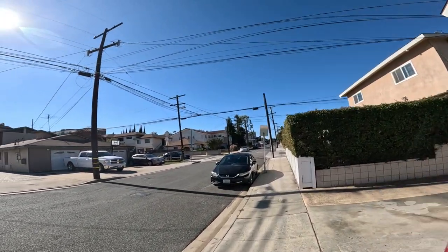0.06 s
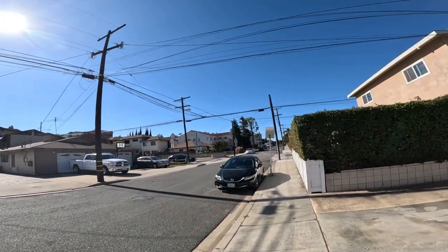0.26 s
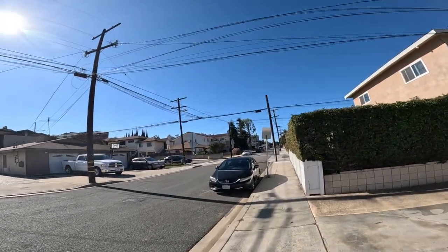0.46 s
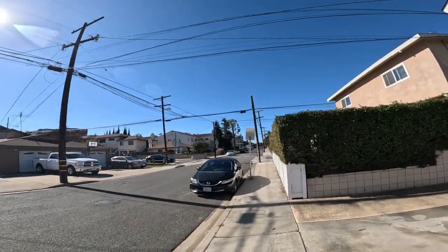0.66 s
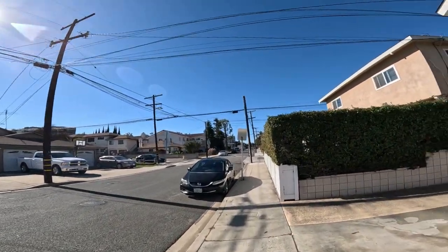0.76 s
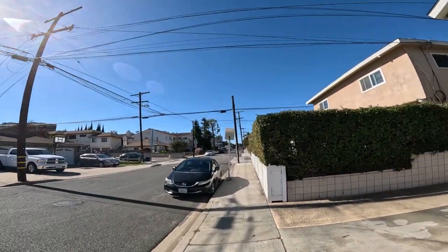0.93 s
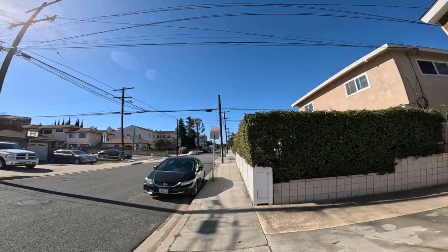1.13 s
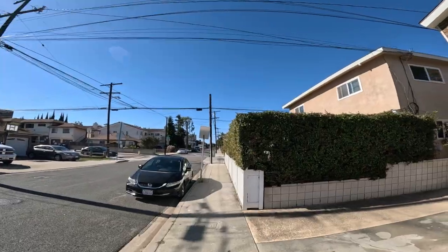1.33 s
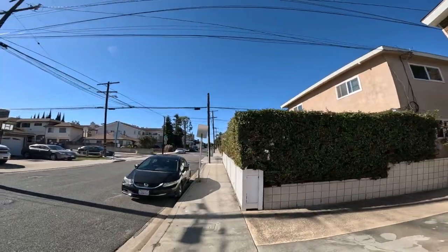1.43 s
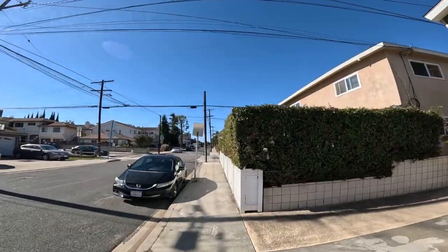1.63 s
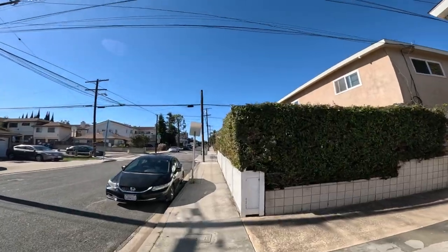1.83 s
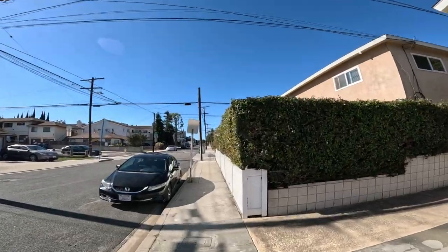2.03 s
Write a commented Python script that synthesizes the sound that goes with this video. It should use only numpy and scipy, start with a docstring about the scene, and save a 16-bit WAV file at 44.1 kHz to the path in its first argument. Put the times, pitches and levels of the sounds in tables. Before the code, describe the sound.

Wind rumbles on the microphone throughout, with clusters of dull thumps around 0.2 to 0.5 seconds and from 1.1 to 1.9 seconds. Underneath, soft shoes scuff concrete about twice a second, with slight ticks of grit. A tiny metal tink comes at 0.5 seconds. A small bird chirps faintly near 0.9 and 1.6 seconds, and far traffic hums very quietly.

```python
"""A windy sidewalk walk

Wind rumbles on the microphone, and little swirls of air thump against its opening.
Underneath, soft soles scuff the concrete about twice a second, and sand ticks and crackles.
A small bird chirps, a bit of metal tinks once, and a quiet street hums far away."""
import sys
import numpy as np
from scipy import signal
from scipy.fft import rfft, irfft
from scipy.io import wavfile

SR = 44100
rng = np.random.default_rng(int(sys.argv[2]) if len(sys.argv) > 2 else 0)


def generate_wav(signal):
    """Clip the signal to [-1, 1] and save it as 16-bit WAV at the path in sys.argv[1]."""
    frames = np.transpose(np.atleast_2d(signal))
    scaled = np.clip(frames, -1, 1) * 32767
    pcm = np.round(scaled).astype(np.int16)
    wavfile.write(sys.argv[1], SR, pcm)


N = 91904
T = np.arange(N) / SR


def from_db(db):
    """Turn decibels into a number to multiply by."""
    return 10 ** (np.asarray(db) / 20)


def rms_one(x):
    """Scale a signal so its average strength (rms) is 1."""
    return x / np.sqrt(np.mean(x ** 2) + 1e-20)


def in_time(rows):
    """Join (time, value) points with straight lines."""
    return np.interp(T, *np.transpose(rows))


def at_hz(points, hz):
    """Read between (frequency, value) points, spaced by octaves."""
    freqs, values = np.transpose(points)
    return np.interp(np.log(hz), np.log(freqs), values)


def drift(rate_hz):
    """A smooth random wobble of about 1 either way; a higher rate wobbles faster."""
    step, warm_up = 40, 2000
    pole = np.exp(-2 * np.pi * rate_hz * step / SR)
    noise = rng.standard_normal(N // step + warm_up + 2)
    slow = signal.lfilter([1], [1, -2 * pole, pole * pole], noise)[warm_up:]
    return np.interp(np.arange(N) / step, np.arange(len(slow)), rms_one(slow))


def band_noise(hz, octaves):
    """Noise in one band around a pitch, at strength 1."""
    edges = np.clip([hz * 2 ** (-octaves / 2), hz * 2 ** (octaves / 2)], 10, SR / 2 - 1000)
    band = signal.butter(2, edges, "band", fs=SR, output="sos")
    return rms_one(signal.sosfilt(band, rng.standard_normal(N + SR // 2))[-N:])


def shaped(x, tone):
    """Give a sound a tone (its balance of low and high), at strength 1."""
    hz = np.maximum(np.fft.rfftfreq(N, 1 / SR), 1)
    return rms_one(irfft(rfft(x) * from_db(at_hz(tone, hz)), N))


def coloured(tone):
    """Noise with the given tone."""
    return shaped(rng.standard_normal(N), tone)


def evened(x, share):
    """Smooth away a share of a noise's random ups and downs in loudness."""
    loudness = np.abs(signal.hilbert(x))
    return rms_one(x / (loudness + .1) ** share)


def burst(s, rise, fall):
    """Swell up to time s, then die away; all three are in seconds."""
    return np.exp(-(np.minimum(T - s, 0) / rise) ** 2 - np.maximum(T - s, 0) / fall)


# Tone of the traffic and of the hiss: f/Hz, relative level/dB
TRAFFIC_TONE = [(200,8),(700,5.5),(1200,1.5),(2000,-7.5),(3000,-15),(4500,-17.5),(7000,-26),(8300,-36.5),(11000,-45),(15000,-59.5)]
HISS_TONE = [(1500,-4.5),(2700,6.5),(4500,1),(7200,-5.5),(8400,-19.5),(14000,-40)]
# How loud each is as time passes: t/s, level/dB
TRAFFIC_LOUDNESS = [(0.02,-51.5),(0.28,-54.5),(0.58,-49.5),(0.72,-48.5),(1.0,-51.5),(1.3,-51.5),(1.8,-49),(2.06,-52.5)]
HISS_LOUDNESS = [(0.02,-71.5),(0.3,-72),(0.58,-73),(0.66,-65.5),(1.07,-67),(1.35,-64),(1.8,-64.5),(2.06,-63)]
def street():
    """Far traffic hums under a faint, high hiss."""
    traffic = from_db(in_time(TRAFFIC_LOUDNESS)) * coloured(TRAFFIC_TONE)
    hiss = from_db(in_time(HISS_LOUDNESS)) * coloured(HISS_TONE)
    return traffic + hiss


# The metal's ringing notes: f/Hz, level/dB, time to fade by 60 dB/s
METAL_NOTES = [(5910,-65,0.36),(9550,-74.5,0.33)]
def tink(s=0.483, rise=0.004):
    """A brief, rough touch sets a small piece of metal ringing on two high notes."""
    contact = from_db(3) * burst(s + rise, rise, fall=0.013)
    out = 0
    for hz, db, fade_s in METAL_NOTES:
        scrape = contact * band_noise(hz, octaves=0.03)
        ring = burst(s, rise, fade_s / np.log(1000)) * np.sin(2 * np.pi * hz * T)
        out += from_db(db) * (scrape + ring)
    return out


# Chirps: t/s, length/s, start f/Hz, end f/Hz, level/dB, waver/share of pitch, echo against note/dB
BIRD_NOTES = [(0.848,0.043,3950,3930,-65,0.0078,-0.5),(0.894,0.04,3950,3670,-58,.028,-1),(1.538,.03,2680,2810,-60,0.0073,-9),(1.583,0.035,4850,4630,-69,0.019,-0.5),(1.622,0.018,3910,5050,-54.5,0.013,-6),(1.636,.012,5000,3960,-56,.02,-5.5),(1.649,0.02,4400,4230,-57,0.019,-1)]
def bird(echo_fall_s=0.023):
    """A bird sings short, wavering slides, blurred by echoes from the houses."""
    out = 0
    for s, length, start_hz, end_hz, db, waver, echo_db in BIRD_NOTES:
        progress = np.clip((T - s) / length, 0, 1)
        hz = (start_hz + (end_hz - start_hz) * progress) * (1 + waver * drift(150))
        swell = np.sqrt(np.abs(np.sin(np.pi * progress)))
        note = from_db(db) * swell * np.sin(2 * np.pi * np.cumsum(hz) / SR)
        tail = (rng.standard_normal(N) * np.exp(-T / echo_fall_s))[:SR // 2]
        echo = signal.fftconvolve(note, tail / np.linalg.norm(tail))[:N]
        out += note + from_db(echo_db) * echo
    return out


# Firm steps on sand: t/s, peak level/dB
SAND_STEPS = [(0.608,-70),(0.644,-69.5),(0.71,-75.5),(1.89,-73.5)]
# Tone of the sand: f/Hz, relative level/dB
SAND_TONE = [(2000,-6),(4000,0),(7500,-0.5),(9500,-7.5),(14000,-15.5)]
def crunch(grains_per_s=1800, spread_db=4):
    """Loose sand crackles faintly, grain by grain, under the weight of a step."""
    weight = sum(from_db(db) * burst(s, rise=0.005, fall=0.024) for s, db in SAND_STEPS)
    clicks = (rng.random(N) < grains_per_s / SR) * rng.choice([-1, 1], N)
    sizes = from_db(spread_db * rng.standard_normal(N))
    return weight * shaped(clicks * sizes, SAND_TONE)


# Cracking grains: t/s, peak level/dB, f/Hz, width/octaves, fall/s
GRIT_TICKS = [(0.095,-62,4680,0.39,.012),(0.164,-55,5660,0.43,0.0012),(0.834,-71,6340,0.39,.002),(1.217,-53.5,3200,0.61,.002)]
def grit(rise=0.0026):
    """Single grains crack under the sole with a thin tick."""
    return sum(from_db(db) * burst(s, rise, fall) * band_noise(hz, width)
               for s, db, hz, width, fall in GRIT_TICKS)


# Soles brushing the ground: t/s, level before dulling/dB, rise/s, fall/s, f/Hz, dull above f/Hz
SOLE_SCUFFS = [(0.060,-49.5,0.0085,0.06,800,4830),(0.356,-40,0.011,0.039,470,1800),(0.392,-54,0.0081,0.033,1200,2000),(0.431,-36.5,0.0084,0.015,510,1100),(0.607,-44.5,0.0034,0.015,900,5000),(0.645,-46,0.022,0.021,1150,4000),(0.71,-56,0.017,0.025,1100,7960),(1.175,-53,0.036,0.043,900,5000),(1.227,-51,0.024,0.039,1200,4900),(1.694,-45.5,0.018,0.024,1250,2100),(1.763,-38.5,0.0024,0.0067,950,3300),(1.785,-54.5,.02,0.029,1700,4940),(2.0,-49,0.012,0.022,900,5000)]
# Tone of a scuff: multiple of its pitch, relative level/dB
SOLE_TONE = [(.2,-15),(.55,-4),(1.0,-2.5),(1.45,-7),(2.2,-15),(4,-22),(7,-29),(11,-49.5)]
def footsteps(roughness_db=1.5):
    """Soft soles rub on rough concrete; each scuff has its own pitch and dullness."""
    out = 0
    for s, db, rise, fall, hz, dull_hz in SOLE_SCUFFS:
        tone = [(hz * multiple, level) for multiple, level in SOLE_TONE]
        rub = evened(coloured(tone), share=0.86)
        grainy_rub = rms_one(rub * from_db(roughness_db * drift(130)))
        dulling = signal.butter(2, dull_hz, fs=SR, output="sos")
        out += from_db(db) * burst(s, rise, fall) * signal.sosfilt(dulling, grainy_rub)
    return out


# Swirls of air hitting the microphone: t/s, peak level/dB, f/Hz
SWIRLS = [(0.217,-19,382),(0.228,-18.5,214),(0.268,-19,223),(0.387,-16.5,292),(0.395,-21.5,227),(0.426,-15.5,150),(0.528,-18,188),(1.134,-23,330),(1.183,-13.5,100),(1.213,-14,110),(1.309,-13,153),(1.366,-18,233),(1.601,-20.5,420),(1.662,-23,257),(1.679,-18.5,262),(1.69,-25.5,187),(1.877,-22.5,237)]
def wind_thumps(width_cycles=0.5, wake_db=-18):
    """Each swirl gives one dull push and pull, with a short wake of churning air."""
    out = 0
    for s, db, hz in SWIRLS:
        cycles = (T - s) * hz
        thump = np.exp(-(cycles / width_cycles) ** 2) * np.cos(2 * np.pi * (cycles + rng.random()))
        wake = from_db(wake_db) * burst(s, rise=0.006, fall=0.0083) * band_noise(hz, octaves=1)
        out += from_db(db) * (thump + wake)
    return out


# Tone of the wind at its usual strength: f/Hz, relative level/dB
WIND_TONE = [(12,-6.5),(25,3),(40,0),(80,1),(125,-4),(200,-7.5),(300,-25),(450,-35),(800,-54.5),(2000,-71.5)]
# Ups and downs of the gusts and of the deep rumble: t/s, relative level/dB
GUST_STRENGTH = [(0.02,-35.5),(0.19,-35.5),(0.225,-25.5),(0.29,-31),(0.36,-35),(0.385,-24),(0.45,-32.5),(0.54,-31.5),(0.57,-33.5),(0.6,-36),(0.8,-33.5),(0.82,-45.5),(0.87,-32.5),(0.96,-37),(1.36,-28),(1.43,-26.5),(1.5,-29),(1.56,-29.5),(1.68,-29.5),(1.72,-38.5),(1.82,-40.5),(1.99,-34),(2.06,-36)]
RUMBLE_STRENGTH = [(0.02, -2.5), (0.04, -38), (0.06, -26), (0.25, -14.5), (0.61, -23.5), (0.63, -14.5),
                   (0.84, -20), (0.87, -12), (1.02, -25.5), (1.18, -19), (1.38, -24.5), (1.41, -37.5),
                   (1.46, -26), (1.55, -27), (1.6, -14.5), (1.71, -21.5), (2.02, -21.5), (2.06, -27.5)]
# How much of those ups and downs each pitch follows: f/Hz, share
GUST_SHARE = [(40,0.011),(150,0.51),(350,1.0)]
RUMBLE_SHARE = [(40,0.55),(120,0.32),(250,0.24)]
def wind(level_db=-23, flicker_db=1.5, usual_gust_db=-32, usual_rumble_db=-23):
    """Air churns at the microphone's opening; stronger gusts are louder and reach higher pitches."""
    bands_hz = 14 * 2 ** np.arange(0, 7.5, .5)
    gains = from_db(at_hz(WIND_TONE, bands_hz)) * np.sqrt(bands_hz)  # higher bands are wider
    gains /= np.linalg.norm(gains)
    gust_db = in_time(GUST_STRENGTH) - usual_gust_db + flicker_db * drift(30)
    rumble_db = in_time(RUMBLE_STRENGTH) - usual_rumble_db
    out = 0
    for hz, gain in zip(bands_hz, gains):
        swing_db = at_hz(GUST_SHARE, hz) * gust_db + at_hz(RUMBLE_SHARE, hz) * rumble_db
        air = evened(band_noise(hz, octaves=0.61), share=0.19)
        out += gain * from_db(swing_db) * air
    return from_db(level_db) * out


def scene():
    """All the sounds add up at one microphone."""
    return (wind() + wind_thumps() + footsteps() + grit() + crunch() + bird() + tink() + street())[None]


def record(dry, cutoff_hz=15700):
    """A steep filter removes the very highest treble."""
    treble_cut = signal.cheby2(12, 70, cutoff_hz, fs=SR, output="sos")
    return signal.sosfilt(treble_cut, dry)


dry = scene()
out = record(dry)
generate_wav(out)
```